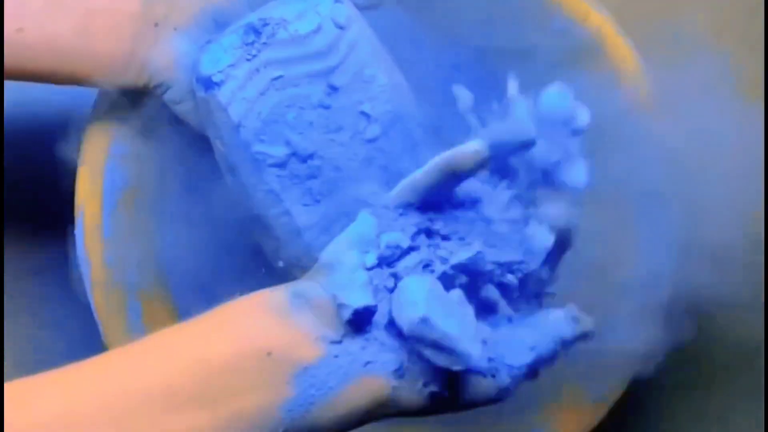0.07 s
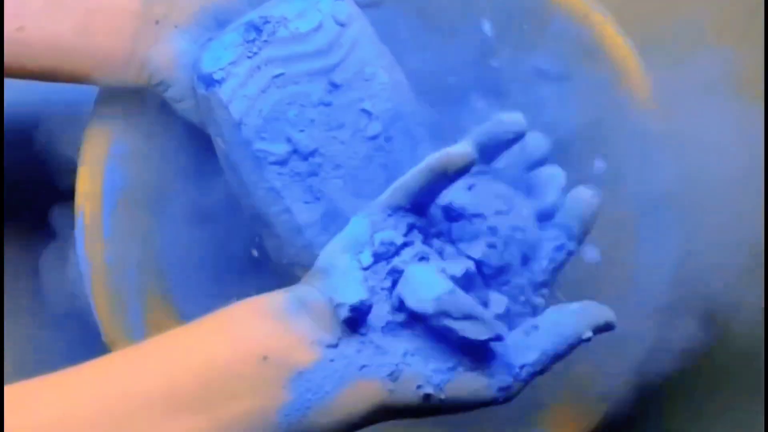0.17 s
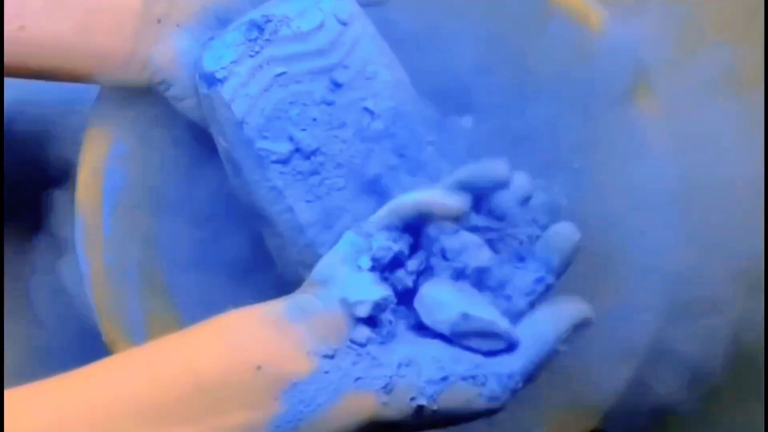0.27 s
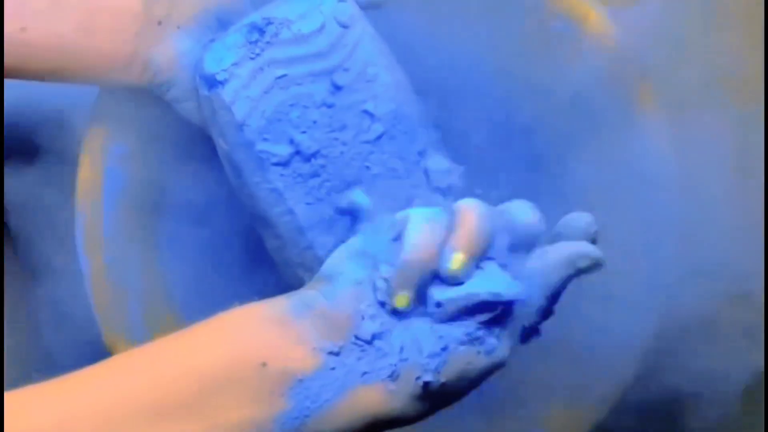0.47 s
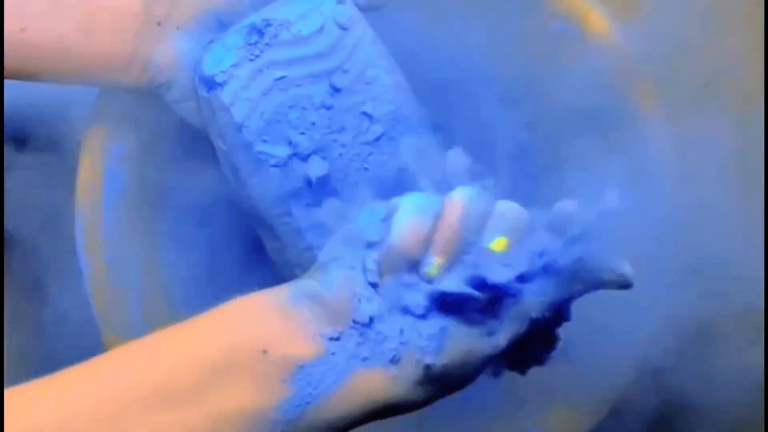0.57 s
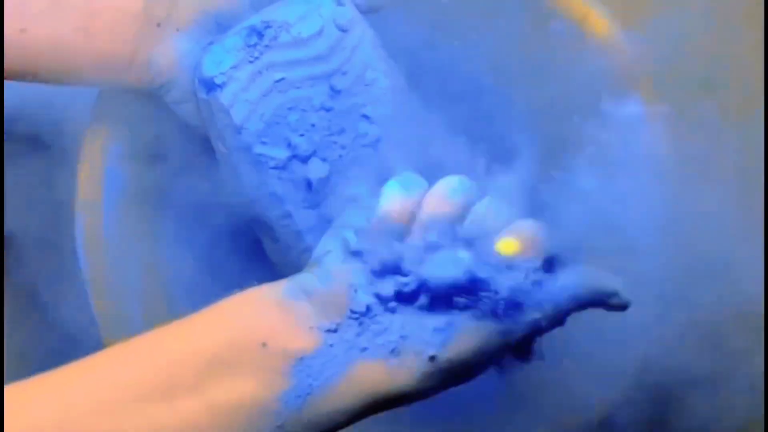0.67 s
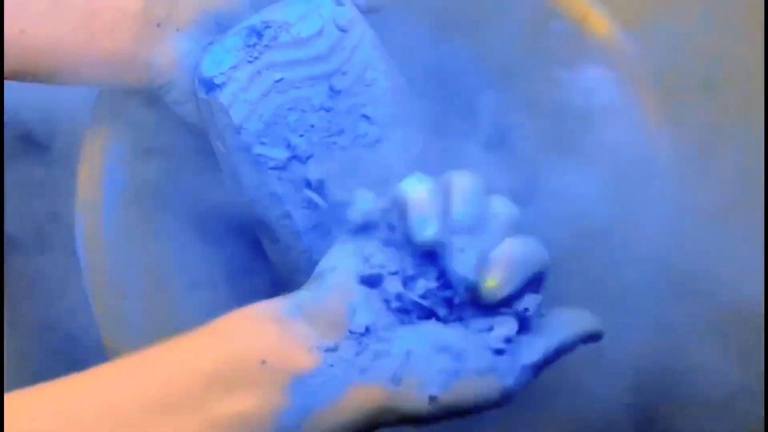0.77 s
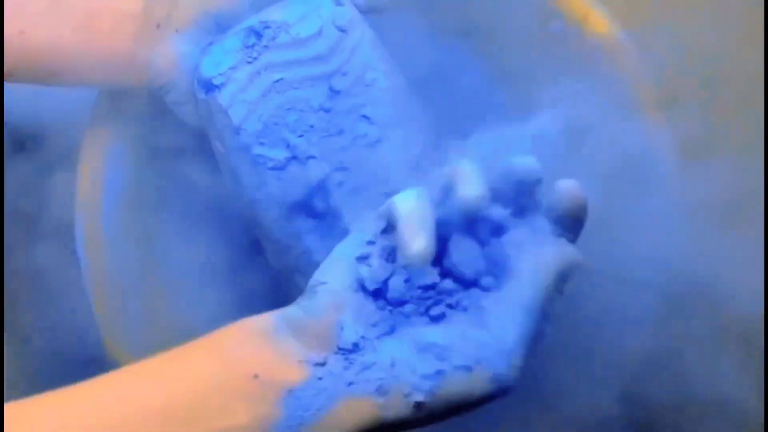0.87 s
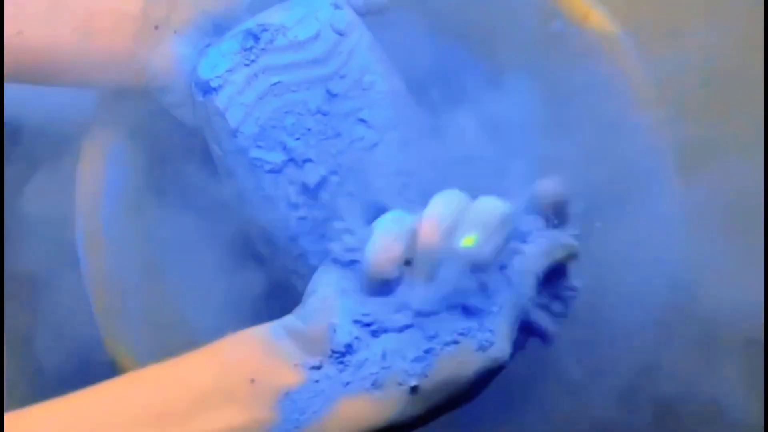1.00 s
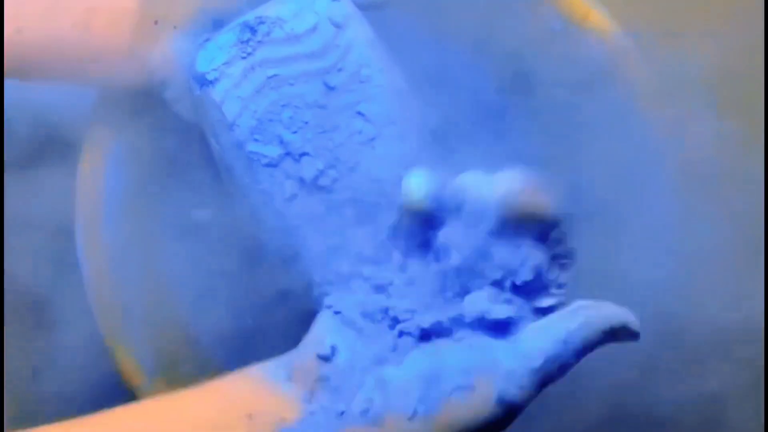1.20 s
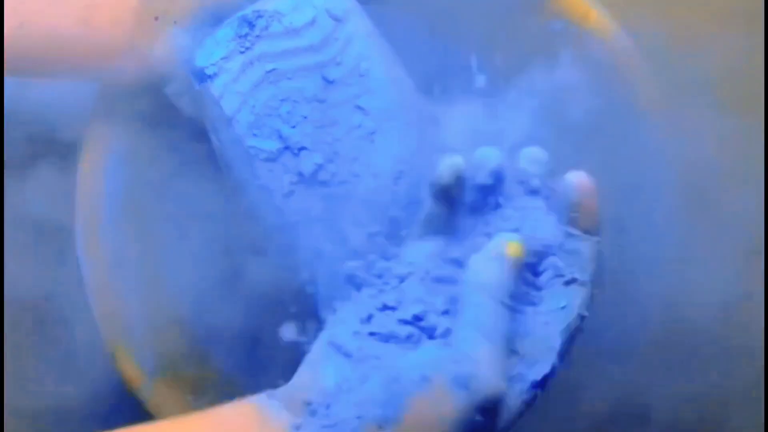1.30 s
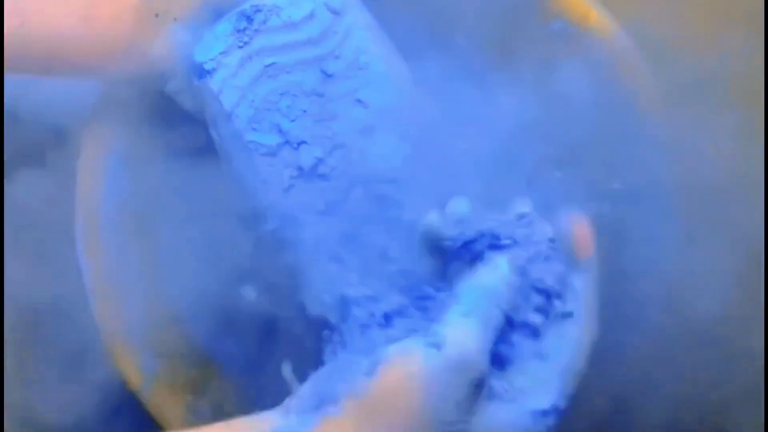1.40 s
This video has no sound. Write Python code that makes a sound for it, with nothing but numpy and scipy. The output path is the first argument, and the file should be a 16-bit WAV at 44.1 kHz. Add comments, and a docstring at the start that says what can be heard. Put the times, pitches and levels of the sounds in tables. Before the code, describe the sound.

Soft chalk is crushed by hand close to stereo microphones: quiet powder hiss, then a loud burst of dull lumpy knocks and crunches, weaker crumbling after, and a last cluster of drier cracks over faint room rumble.

```python
"""A hand crushes soft chalk over a plastic bowl, close to a pair of spaced microphones.
From the start: room noise and rumble (filtered noise), powder hiss (dense clicks), crumbs (clicks ringing bowl modes).
From 0.1 s lumps knock dully: sagging thuds, bowl modes, noise cracks and snaps, each with a short scattered tail.
From 0.23 s grit rasps in bright bands; knocks are loudest to 0.5 s, then weaker, with a last cluster after 1.07 s."""
import sys
import numpy as np
from scipy import signal
from scipy.fft import rfft, irfft
from scipy.io import wavfile

SR = 44100
rng = np.random.default_rng(int(sys.argv[2]) if len(sys.argv) > 2 else 0)


def unload_wav(signal):
    """Save mono or channel-first audio to the path in sys.argv[1] as 16-bit WAV at rate SR, clipped to [-1, 1]."""
    wavfile.write(
        sys.argv[1],
        SR,
        np.round(np.clip(np.atleast_2d(signal).T, -1, 1) * 32767).astype(np.int16),
    )


N = 63945
BURST_N, TAIL_N = 4096, 8192  # samples


def gain_of(db):
    """Amplitude ratio of a level in dB."""
    return 10 ** (np.asarray(db) / 20)


def evened(x):
    """Scale to unit RMS over all channels."""
    return x / np.sqrt(np.mean(x ** 2) + 1e-20)


def colour(x, points):
    """Filter by a spectrum interpolated on a log-frequency axis."""
    f, db = np.transpose(points)
    hz = np.fft.rfftfreq(x.shape[-1], 1 / SR)
    curve_db = np.interp(np.log(hz + 1), np.log(f + 1), db, left=-60)
    return irfft(rfft(x) * gain_of(curve_db), x.shape[-1])


def octave_band(spectrum, centre_hz, width_oct, n):
    """Gaussian band on an octave axis, back in the time domain."""
    hz = np.fft.rfftfreq(n, 1 / SR) + 1
    return irfft(spectrum * np.exp(-(np.log2(hz / centre_hz) / width_oct) ** 2), n)


def highpass(x, hz):
    """Second-order Butterworth low cut."""
    return signal.sosfilt(signal.butter(2, hz, "high", fs=SR, output="sos"), x)


def level(points):
    """Gain curve, linear in dB between (t/s, level/dB) points."""
    s, db = np.transpose(points)
    return gain_of(np.interp(np.arange(N) / SR, s, db))


def add(mix, s, sound):
    """Add a sound at s seconds, cut at the end of the mix."""
    part = mix[max(round(s * SR), 0):][:len(sound)]
    part += sound[:len(part)]


def clicks(per_s, spread_db):
    """Two unrelated trains of random clicks, a few of them large."""
    size = gain_of(spread_db * np.minimum(rng.exponential(1, (2, N)), 4))
    struck = rng.random((2, N)) < per_s / SR
    return size * struck * rng.choice([-1., 1.], (2, N))


# steady room noise spectrum: f/Hz, relative level/dB
ROOM_SPECTRUM = [(15, -32), (25, 20), (164, -4), (359, -0.5), (495, -8), (1110, -10), (1800, -27),
                 (2770, -29.5), (6550, -17), (14300, -21.5), (15500, -71)]
# low rumble: t/s, level/dB
RUMBLE_LEVEL = [(0.0, -43.5), (0.064, -39), (0.108, -45), (0.148, -27), (0.222, -36), (0.242, -36),
                (0.358, -42), (0.374, -50), (0.634, -34.5), (0.662, -67), (0.814, -32), (0.832, -45.5),
                (1.408, -32), (1.45, -54)]
ROOM_DB, RUMBLE_HZ, RUMBLE_WIDTH_HZ = -39, 61, 60


def room():
    """Steady faint noise plus a lumpy low rumble, noise in a Gaussian band."""
    hz = np.fft.rfftfreq(N, 1 / SR)
    band = np.exp(-((hz - RUMBLE_HZ) / RUMBLE_WIDTH_HZ) ** 2)
    rumble = irfft(rfft(rng.standard_normal((2, N))) * band, N)
    steady = colour(rng.standard_normal((2, N)), ROOM_SPECTRUM)
    return gain_of(ROOM_DB) * evened(steady) + level(RUMBLE_LEVEL) * evened(rumble)


# powder: t/s, hiss level/dB, finest dust level/dB
POWDER_LEVEL = [(0.0, -45.5, -48), (0.192, -48, -54), (0.227, -45, -52), (0.232, -33.5, -41),
                (0.294, -38.5, -53), (0.39, -47, -56), (0.456, -41.5, -50), (0.584, -46, -51.5),
                (0.698, -48.5, -45.5), (0.734, -47.5, -50.5), (0.778, -39.5, -46), (0.802, -39, -39.5),
                (0.868, -42.5, -50), (0.894, -31.5, -42), (0.944, -44, -46.5), (0.996, -50, -54),
                (1.074, -46, -47), (1.081, -28.5, -28.5), (1.094, -34, -38), (1.114, -39.5, -39.5),
                (1.15, -44, -42.5), (1.222, -45.5, -43), (1.248, -30.5, -38.5), (1.3, -42, -46),
                (1.336, -39, -44), (1.372, -46, -55), (1.416, -47, -49), (1.45, -44.5, -48)]
# powder spectrum: f/Hz, relative level/dB
POWDER_SPECTRUM = [(710, 4), (1200, 0), (1860, 1.5), (2120, -4), (3140, 1), (3460, -1), (4200, -1.5),
                   (6040, -7), (8880, -9.5), (10500, -15.5), (13900, -10), (15500, -48)]
GRAINS_PER_S, GRAIN_SPREAD_DB, FINE_HZ = 4700, 2, 9400


def powder():
    """Dense grains rubbing as the fist closes; the finest dust, above FINE_HZ, hisses on its own."""
    grains = colour(clicks(GRAINS_PER_S, GRAIN_SPREAD_DB), POWDER_SPECTRUM)
    hz = np.fft.rfftfreq(N, 1 / SR) + 1
    fine = irfft(rfft(grains) / (1 + (FINE_HZ / hz) ** 10), N)
    table = np.array(POWDER_LEVEL)
    hiss = level(table[:, [0, 1]]) * evened(grains - fine)
    dust = level(table[:, [0, 2]]) * evened(fine)
    return hiss + dust


RISE_CYCLES = 0.18  # time constant of a mode's swell


def ring(hz, t60_s):
    """One decaying bowl mode, swelling gradually because chalk is soft."""
    t = np.arange(BURST_N) / SR
    swell = 1 - np.exp(-t * hz / RISE_CYCLES)
    return swell * gain_of(-60 * t / t60_s) * np.sin(2 * np.pi * hz * t)


# bowl modes, shared with the knocks: f/Hz, relative level/dB, t60/s under a lump
BOWL_MODES = [(164.2, -3, 0.12), (229.4, -3, 0.15), (263, 0, 0.049), (348, -4, 0.063), (418.6, -4, 0.098),
              (571, 2, 0.051), (682, 0.5, 0.04), (808, -4, 0.036), (1020, 5, 0.017), (1160, -2, 0.019),
              (1670, 0.5, 0.023), (2120, -5.5, 0.015)]
# crumb patter: t/s, level/dB
CRUMB_LEVEL = [(0, -42.5), (.09, -41), (.15, -33.5), (.215, -42.5), (.25, -20), (.31, -26.5), (.375, -37.5),
               (.42, -26.5), (.47, -28), (.54, -38), (.62, -37.5), (.735, -46.5), (.775, -30), (.86, -36),
               (.91, -30.5), (.96, -38), (.995, -45.5), (1.06, -47.5), (1.1, -27.5), (1.15, -33),
               (1.2, -43.5), (1.25, -28.5), (1.295, -41.5), (1.325, -29.5), (1.35, -32), (1.39, -41.5),
               (1.45, -36.5)]
CRUMBS_PER_S, CRUMB_SPREAD_DB = 1800, 2
CRUMB_T60_RATIO = 0.75  # of the t60 under a lump


def crumbs():
    """Small bits land at random, each ringing one bowl mode."""
    hits = clicks(CRUMBS_PER_S, CRUMB_SPREAD_DB)
    mode = rng.integers(0, len(BOWL_MODES), (2, N))
    out = np.zeros((2, N))
    for k, (hz, db, t60_s) in enumerate(BOWL_MODES):
        tap = gain_of(db) * ring(hz, CRUMB_T60_RATIO * t60_s)
        out += signal.oaconvolve(hits * (mode == k), tap[None], axes=1)[:, :N]
    return level(CRUMB_LEVEL) * evened(out)


# snap spectrum: f/Hz, relative level/dB
SNAP_SPECTRUM = [(1500, 6.5), (3500, -17), (7000, -6.5), (12500, -12), (15000, -40)]
# lumps that crack or land; the levels are offset by THUD_DB, CRACK_DB and SNAP_DB below:
# t/s, level/dB, thud centre f/Hz, crack level/dB re lump, snap level/dB re lump, crack f/Hz, thud rise/cycles
LUMPS = [(.107, -17, 800, -8.5, -17.5, 1340, 1.24), (0.1099, -15, 510, -23, -26, 1020, 0.6),
         (0.1439, -20, 1050, -11.5, -24, 1130, 0.39), (.158, -14.5, 696, -10.5, -30, 1320, 0.65),
         (.2335, -2, 658, -33, -18, 1900, 2.45), (0.235, 2.5, 467, -11.5, -46, 1650, 1.68),
         (0.245, -2, 241, -39, -37, 950, 0.88), (.252, -0.5, 495, -6, -18, 920, 0.69),
         (0.2585, 1.5, 295, -19, -40, 1670, 0.64), (.270, -16, 232, -20, -36, 1600, 1.5),
         (0.29, -10, 220, -23, -35, 1520, 1.27), (0.302, -27, 223, -20, -32.5, 1670, 1.7),
         (.308, -18, 1652, -15, -30, 1670, 6.8), (.314, -20.5, 1660, -5, -22, 1670, 3.8),
         (0.321, -21, 1600, -12, -25, 1650, 2.8), (.329, -19.5, 530, -31, -36, 1180, 1.74),
         (0.338, -20, 221, -7.5, -36, 1390, 0.57), (.354, -17, 416, -7.5, -34, 1580, 1.02),
         (.385, -17, 286, -14, -34, 1040, 0.86), (.393, -9, 664, -7.5, -43, 1450, 1.73),
         (0.416, 0, 500, -18.5, -47, 1640, 0.7), (0.423, -11, 281, -31, -42, 970, 1.02),
         (.431, -2, 322, -25.5, -46, 1660, 0.68), (.439, -12, 320, -29, -40, 1095, 0.72),
         (.460, -29, 550, 6, -24, 1180, 0.67), (0.4793, -8.5, 638, -9, -36, 1520, 2.1),
         (0.4817, -4.5, 280, -26, -30, 1030, 0.61), (.489, -20, 296, -31, -34, 1030, 0.48),
         (.509, -9, 270, -17, -35, 1910, 0.62), (0.524, -17, 208, -14.5, -20, 1190, 0.38),
         (.5705, -22.5, 830, -19, -33, 1080, 1.25), (0.5734, -22, 280, -31, -30, 1100, 0.37),
         (0.6031, -18.5, 1180, -12.5, -15, 2260, 1.02), (0.625, -23.5, 270, -17, -28, 1220, 1.2),
         (0.755, -16.5, 684, -5.5, -23, 1580, 1.2), (0.7592, -15, 225, -27, -28, 1100, 0.64),
         (0.7659, -11, 560, -39, -39, 1020, 0.65), (.7672, -7.5, 198, -13.5, -35, 1120, 0.7),
         (0.7711, -15, 570, -1.5, -29, 1640, 0.97), (0.846, -21, 218, -7, -23, 1570, 0.6),
         (.877, -24, 263, -13, -20, 982, 1.1), (0.886, -36, 294, -8, -9, 1270, 0.61),
         (0.9091, -13, 330, -31, -33, 1063, 0.62), (0.9074, -16, 1180, -26, -27, 1200, 2.4),
         (0.952, -21, 168, -34, -34, 1150, 0.86), (1.0716, -25.5, 1100, -1, -9, 1410, 1.3),
         (1.0782, -17.5, 490, -2.5, -3.5, 2250, 1.3), (1.085, -14, 417, -17, -8, 1600, 1.63),
         (1.094, -17, 376, -25, -15, 1610, 0.84), (1.104, -21, 410, -24, -13, 1270, 0.66),
         (1.121, -17.5, 630, -32, -12, 1320, 3.1), (1.136, -23, 620, -7.5, -29, 1200, 1.3),
         (1.1388, -17.5, 300, -20, -21, 900, 0.89), (1.2325, -18, 770, -9, -9, 950, 1.36),
         (1.249, -22, 945, 3, -16, 1850, 7), (1.3065, -19, 1500, -6, -20, 1550, 1.24),
         (1.3115, -19.5, 790, -2, -22, 1580, 1.2), (1.3132, -17.5, 370, -17, -23, 1200, 0.4),
         (1.3165, -20, 684, -6.5, -25, 975, 0.72), (1.3272, -20, 646, 0.5, -27, 1870, 1.3),
         (1.3358, -21, 660, -8, -22, 2150, 0.34), (1.429, -39, 258, 13.5, -24, 1670, 0.2)]
THUD_DB, CRACK_DB, SNAP_DB, RING_DB = -5, -2, 6.5, -6.5  # RING_DB: bowl peak re thud
MODE_SLOPE_DB_PER_OCT2, STRIKE_SPREAD_DB = -18, 3
SAG_OCT = 0.29  # pitch drop per rise time of a one-cycle thud; longer rises sag less
CRACK_RISE_S, CRACK_S, CRACK_WIDTH_OCT, SNAP_S = 0.00027, 0.0037, 0.42, 0.0028
LUMP_LOW_CUT_HZ = 140


def thud(centre_hz, rise_cycles):
    """Short sine pulse sagging in pitch, at centre_hz where its envelope peaks."""
    u = np.arange(BURST_N) / SR * centre_hz / rise_cycles  # time in rise times
    hz = centre_hz * 2 ** (SAG_OCT / rise_cycles * (1 - np.minimum(u, 4)))
    return (u * np.exp(1 - u)) ** 2 * np.sin(2 * np.pi * np.cumsum(hz) / SR)


def crack_burst(noise, hz):
    """Dry crack: band noise with a fast rise and exponential decay."""
    t = np.arange(BURST_N) / SR
    band = evened(octave_band(rfft(noise), hz, CRACK_WIDTH_OCT, BURST_N))
    return band * np.minimum(t / CRACK_RISE_S, 1) * np.exp(-t / CRACK_S)


def knocks():
    """Each lump thuds, rings the bowl modes near its centre, and adds a dry crack and a bright snap."""
    body, snap = np.zeros(N), np.zeros(N)
    snap_decay = np.exp(-np.arange(BURST_N) / SR / SNAP_S)
    rings = np.array([gain_of(db) * ring(hz, t60_s) for hz, db, t60_s in BOWL_MODES])
    mode_hz = np.transpose(BOWL_MODES)[0]
    for s, db, centre_hz, crack_db, snap_db, crack_hz, rise_cycles in LUMPS:
        spot_db = STRIKE_SPREAD_DB * rng.standard_normal(len(BOWL_MODES))
        distance_oct = np.log2(mode_hz / centre_hz)
        bowl = gain_of(MODE_SLOPE_DB_PER_OCT2 * distance_oct ** 2 + spot_db) @ rings
        blow = thud(centre_hz, rise_cycles) + gain_of(RING_DB) * bowl / abs(bowl).max()
        crack_noise, snap_noise = rng.standard_normal((2, BURST_N))
        crack = gain_of(crack_db + CRACK_DB) * crack_burst(crack_noise, crack_hz)
        add(body, s, gain_of(db) * (gain_of(THUD_DB) * blow / abs(blow).max() + crack))
        add(snap, s, gain_of(db + snap_db + SNAP_DB) * snap_noise * snap_decay)
    return highpass(body, LUMP_LOW_CUT_HZ) + colour(snap, SNAP_SPECTRUM)


TAIL_DB, TAIL_T60_S, TAIL_RISE_S = -6, 0.07, 0.0092


def tail(x):
    """Short scattered reflections from the bowl and table, unrelated in the two channels."""
    t = np.arange(TAIL_N) / SR
    envelope = gain_of(-60 * t / TAIL_T60_S) * np.minimum(t / TAIL_RISE_S, 1)
    taps = rng.standard_normal((2, TAIL_N)) * envelope
    return signal.fftconvolve(x[None], taps / np.linalg.norm(taps[0]), axes=1)[:, :N]


# grit cracking or grinding under the fingers: t/s, length/s, level/dB, f/Hz
GRIT = [(.233, 0.0097, -31.5, 4180), (0.25, 0.0043, -34, 4960), (0.43, 0.0058, -40, 4200),
        (0.458, .006, -38.5, 4420), (0.888, 0.021, -36, 4160), (1.088, 0.0034, -31.5, 6050),
        (1.085, 0.0049, -27, 12800), (1.246, 0.045, -46, 4400)]
RASP_WIDTH_OCT = 0.18


def rasps():
    """Gritty grains in a bright band, starting sharply and fading over each burst."""
    out, t = np.zeros((2, N)), np.arange(N) / SR
    grains = rfft(clicks(GRAINS_PER_S, GRAIN_SPREAD_DB))
    for s, length_s, db, hz in GRIT:
        band = evened(octave_band(grains, hz, RASP_WIDTH_OCT, N))
        envelope = np.sin(np.pi * np.sqrt(np.clip((t - s) / length_s, 0, 1)))
        out += gain_of(db) * envelope * band
    return out


# phase by which the right microphone trails the left: f/Hz, turn/rad
MIC_LAG = [(100, 0.5), (450, 0.25), (620, 1), (900, 1.5), (1200, 1.12), (1700, 2.5), (3000, 2.5), (4400, 6),
           (9000, 10), (15000, 20.5)]


def trailing():
    """Phase turn from the left microphone to the right, least in the bass."""
    f, turn_rad = np.transpose(MIC_LAG)
    return np.exp(-1j * np.interp(np.fft.rfftfreq(N, 1 / SR), f, turn_rad))


# left-right likeness of the diffuse layers: f/Hz, likeness/(0 to 1)
LIKENESS = [(60, 0.75), (105, 0.22), (150, 0.74), (300, 0.76), (700, 0.37), (2000, 0.12), (5000, 0.21),
            (9000, 1), (15000, 0.07)]


def spaced(x):
    """The right microphone hears the left one's sound late, mixed with an unrelated part."""
    f, alike = np.transpose(LIKENESS)
    hz = np.fft.rfftfreq(N, 1 / SR)
    c = np.clip(np.interp(np.log(hz + 1), np.log(f), alike), 0, 1)
    left, other = rfft(x)
    right = c * left * trailing() + np.sqrt(1 - c ** 2) * other
    return np.array([x[0], irfft(right, N)])


def scene():
    """Lumps arrive with the microphone lag; the diffuse layers are partly unrelated."""
    lumps = knocks()
    late = irfft(rfft(lumps) * trailing(), N)
    diffuse = room() + powder() + crumbs() + gain_of(TAIL_DB) * tail(lumps) + rasps()
    return np.array([lumps, late]) + spaced(diffuse)


LOW_CUT_HZ, EDGE_HZ = 75, 15700


def record(dry):
    """Microphone bass roll-off, overload at full scale, then the band limit."""
    held = np.clip(highpass(dry, LOW_CUT_HZ), -1, 1)
    band_limit = signal.firwin(511, EDGE_HZ, window=("kaiser", 9), fs=SR)
    return signal.oaconvolve(held, band_limit[None], "same", axes=1)


dry = scene()
out = record(dry)
unload_wav(out)
```